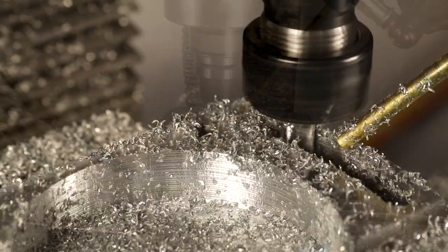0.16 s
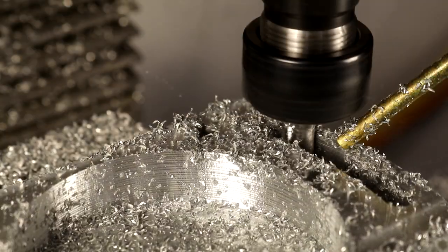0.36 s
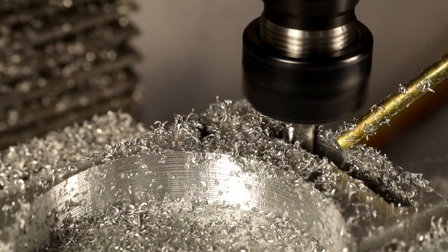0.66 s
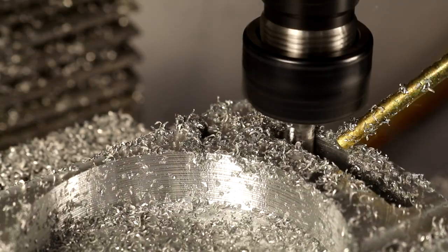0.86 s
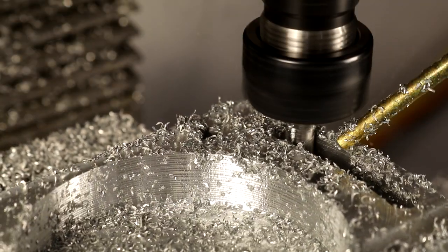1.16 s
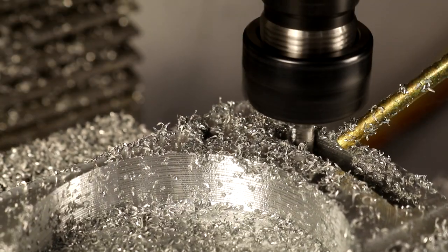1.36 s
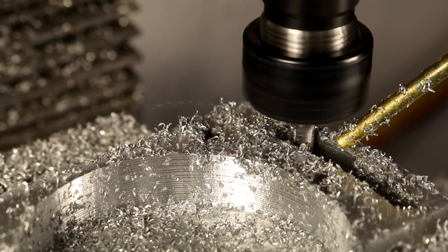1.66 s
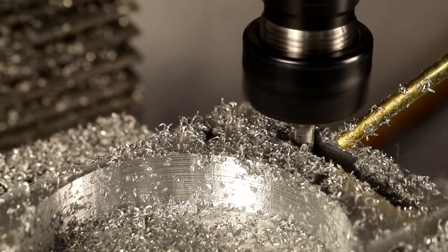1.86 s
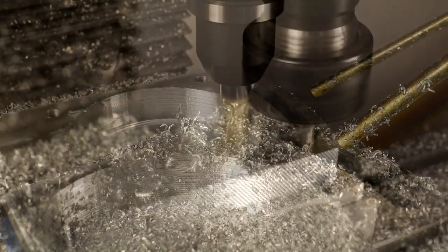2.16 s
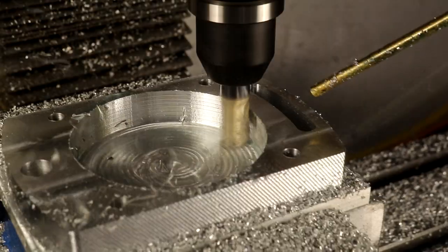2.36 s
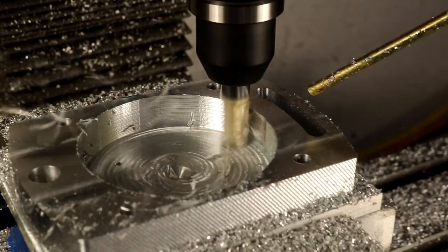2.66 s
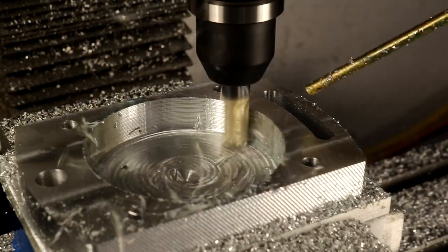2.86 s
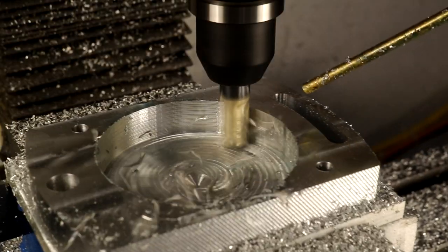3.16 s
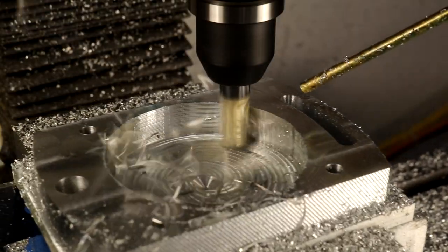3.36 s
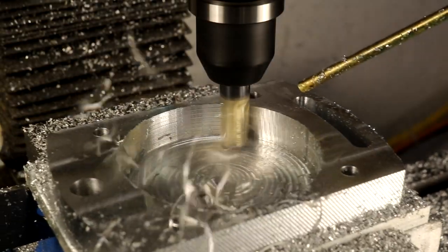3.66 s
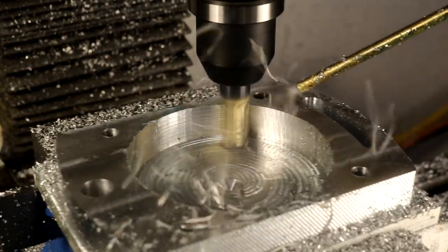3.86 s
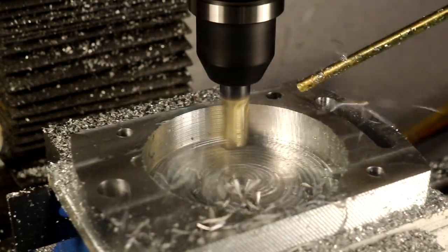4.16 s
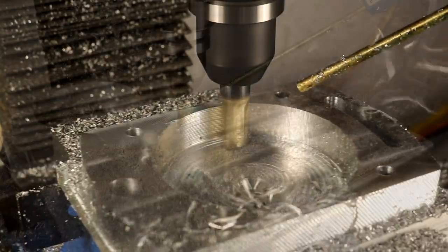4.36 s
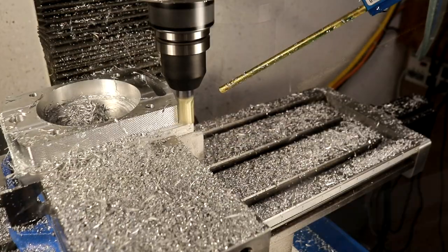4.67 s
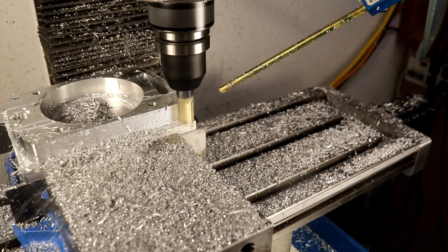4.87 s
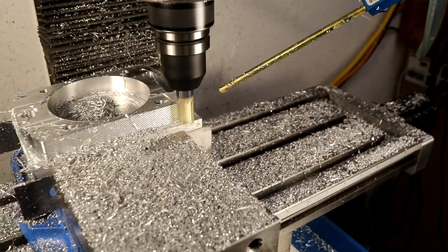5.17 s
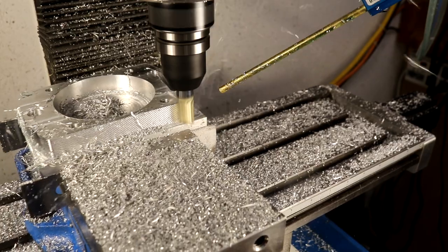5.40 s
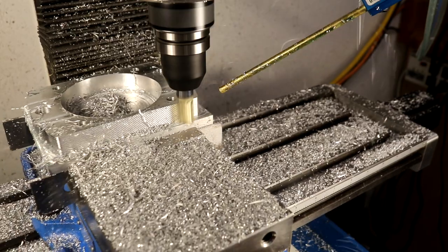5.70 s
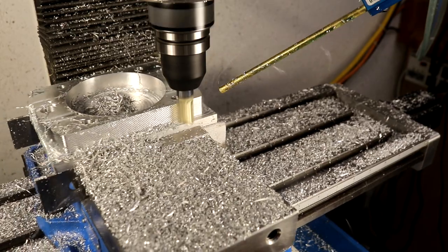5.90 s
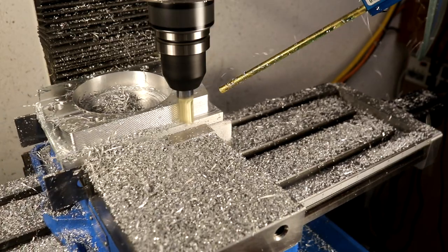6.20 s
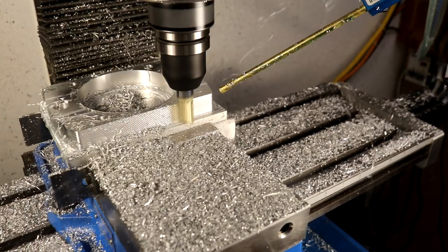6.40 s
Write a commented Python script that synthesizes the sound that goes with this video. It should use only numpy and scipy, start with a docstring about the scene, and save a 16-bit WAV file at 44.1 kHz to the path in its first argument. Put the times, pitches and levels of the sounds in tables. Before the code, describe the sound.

Close to a milling machine, a cutter rasps through metal under a constant, faintly whistling hiss of air. Four passes blend into one another: a very short heavy cut, a quieter one with ticking chips, a throbbing cut that squeals and groans briefly as chips strike the enclosure, and a stronger humming cut with thin ringing and chatter. The surrounding walls add only weak echoes.

```python
"""A three-flute end mill cuts aluminium in a milling machine; four passes dissolve into each other.
Periodic cutting forces hum at multiples of the spindle speed, and tearing metal rasps, partly alike on
every turn. An air jet hisses over the cutter, chopped by its flutes, and makes hollows of the work whistle.
Flung chips patter on the enclosure, whose walls add weak echoes. At times resonances of the cut squeal,
groan or chatter, and the table thrums as the last pass bites."""
import sys
import numpy as np
from scipy import signal
from scipy.fft import rfft, irfft, next_fast_len
from scipy.io import wavfile
from scipy.ndimage import map_coordinates

SR = 44100
rng = np.random.default_rng(int(sys.argv[2]) if len(sys.argv) > 2 else 0)


def to_wav(s):
    """Save 16-bit WAV."""
    ch = np.atleast_2d(s).T  # columns
    pcm = np.round(np.clip(ch, -1, 1) * 32767)  # PCM
    wavfile.write(sys.argv[1], SR, pcm.astype(np.int16))


N = 288414
TIME = np.arange(N) / SR
FLUTES = 3

# The passes: heavy, light, pocket, edge. Each row: fade-in start and end in seconds, spindle speed in Hz,
# repeating share of the midrange rasp (0-1), flute beat depth in dB, air chop depth in dB.
PASSES = [(-.2, -.1, 41.4, 0.16, 2, -0.5), (0.137, 0.342, 42.82, 0.11, -0.5, 1),
          (2.005, 2.437, 41.39, 0.16, 1.2, 0.83), (4.292, 4.645, 41.41, 0.2, 1, 1.5)]
# The steady cut of each pass. Each row: rasp level, hum level, throb depth, chatter depth, all in dB.
CUTS = [(-39.5, -51, 1, 2), (-50, -66.5, 0.5, 3), (-45, -47.5, 0.5, -0.2), (-41, -44, 1.5, 0.1)]
# Rasp and hum swell or sink; near 4.5 s the hum dips briefly as two passes dissolve into each other.
# Each row: peak, rise, fall in seconds, rasp and hum change in dB.
CUT_SWELLS = [(0.03, 0.12, 0.083, 3, 4.5), (2.07, 0.073, 0.13, 2, -1), (2.45, 0.13, 0.25, 0.5, 1.5),
              (2.99, 0.46, 0.41, 3, 3), (4.48, 0.05, 0.099, 1, -8), (4.76, 0.17, 0.66, 1.5, 1.5),
              (5.76, 0.12, 0.061, 0.5, 3), (6.3, 0.53, 0.25, -1, -1)]
# Broad response of work and machine to the cut. Each row: frequency in Hz, relative gain in dB.
BODY_HEAVY = [(25, -27), (105, -28), (186, -14), (263, -6), (284, -10), (607, -7.5), (830, -3), (873, -9),
              (1110, -5.5), (2330, -5), (2630, 0.5), (3490, -3), (4600, -8), (5600, -24)]
BODY_LIGHT = [(25, -24), (90, -25), (105, -7), (152, -18), (205, -13), (263, -2), (402, -7.5), (660, -11.5),
              (840, -0.5), (1060, -10), (1250, -4.5), (3500, -1), (3800, -11.5), (4500, -20), (5600, -28)]
BODY_POCKET = [(25, -32), (90, -7.5), (152, -17), (169, -7.5), (243, -3), (352, -6), (483, -5.5),
               (513, -2.5), (676, -8), (830, -3.5), (1160, -10.5), (1390, -3.5), (4600, -6), (5600, -34)]
BODY_EDGE = [(25, -26), (37, -22), (49, -13), (76, -31), (120, -4.5), (136, -15.5), (205, -9.5),
             (223, -7.5), (263, -3), (295, -2.5), (352, -11.5), (1970, -8), (3220, -5), (4600, -11),
             (5600, -23)]
# Sharp resonances of tool and work. Each row: frequency in Hz, width in Hz, lift in dB.
MODES_HEAVY = [(814, 30, 9.5), (1720, 200, 2.5), (3400, 380, 3.5)]
MODES_LIGHT = [(297, 14, 6.5), (1900, 30, 3.8), (2790, 170, 3.1), (3550, 300, 3.8)]
MODES_POCKET = [(539, 18, 5.7), (1330, 88, 0.6), (2440, 72, 6), (3640, 150, 4.6)]
MODES_EDGE = [(3290, 40, 3.5), (1560, 210, 1.4)]
# Stereo image of the rasp. Each row: frequency in Hz, left-right coherence (0-1).
RASP_COHERENCE = [(40, 0.72), (150, 0.76), (380, 0.85), (950, 0.62), (4000, 0.6)]
# The hum throbs: its strongest brief swells and dips.
# Each row: peak and half-length in seconds, change in dB.
HUM_THROBS = [(2.45, 0.03, 3), (2.5, 0.014, -7), (2.64, 0.025, -6), (2.73, 0.025, 4), (2.78, 0.018, -5),
              (2.85, 0.025, 3), (2.985, 0.02, -5), (3.1, 0.022, 3.5), (3.145, 0.022, -5), (3.52, 0.04, 4),
              (4.89, 0.014, -7), (4.95, 0.016, -6), (5.08, 0.016, -8), (5.18, 0.022, 2.5),
              (5.28, 0.022, 2.5), (5.425, 0.022, 5), (5.845, 0.02, -7), (5.91, 0.05, -3)]
# Tones locked to the spindle. Each row: multiple of the spindle speed, base level in dB.
ORDERS_HEAVY = [(2, -67), (3, -60), (11, -60), (18, -61), (20, -49.5), (22, -60), (24, -56), (30, -61),
                (32, -56), (41, -60), (68, -56)]
ORDERS_LIGHT = [(1.5, -85), (2, -92), (3, -75), (8, -89), (44, -73)]
ORDERS_POCKET = [(2, -79), (3, -63), (4, -68), (7, -65.5), (9, -63), (13, -63), (17, -68), (20, -72),
                 (29, -70), (35, -63), (38, -74)]
ORDERS_EDGE = [(1, -79), (2, -73), (3, -57.5), (4, -74), (5, -64), (7, -66.5), (8, -62), (9, -58),
               (11, -71), (13, -64), (16, -70), (17, -64), (20, -62.5), (23, -68), (29, -69), (35, -64),
               (38, -61.5), (79, -59)]
# The air of each pass. Each row: level in dB, fizz drift in dB per second, time and half-length in
# seconds of the cutter's crossing of the jet, rise at the crossing in dB.
AIR = [(-34.5, 1, 0.03, 0.15, 1.5), (-34, 2.5, 0.7, 0.55, 1.3), (-35, -2, 3.38, 1, 2.5),
       (-34, -0.5, 5.8, 1, 2.5)]
# Spectrum of the jet breaking on tool and work. Each row: frequency in Hz, relative gain in dB.
JET_HEAVY = [(4000, -27), (5080, -14), (5600, -11.5), (7060, -7.5), (7670, -1.5), (7920, -5.5),
             (9560, -12.5), (10770, -12), (12490, -15), (13090, -18), (15590, -19)]
JET_LIGHT = [(3120, -23.5), (3960, -22), (4310, -15), (4480, -20), (4720, -16.5), (5150, -12), (5400, -12),
             (5800, -10), (6550, -12), (6890, -6), (7060, -10.5), (7600, 1), (7950, -4.5), (8150, -2.5),
             (8350, -4), (8560, -0.5), (9390, -14.0), (10770, -7), (11020, -13), (11630, -11.5),
             (12490, -17), (13090, -14), (15160, -16.5), (15590, -20)]
JET_POCKET = [(4000, -23.5), (5080, -11.5), (6250, -6), (6750, -3), (7000, -5), (7550, -1), (7920, -1.5),
              (8350, -1), (9650, -5.5), (10250, -9.5), (10850, -7), (11630, -10), (13700, -11),
              (14810, -15), (15590, -15.5)]
JET_EDGE = [(4160, -18.5), (5250, -9), (5430, -9.5), (5770, -4.5), (6290, -6.5), (6630, -1.5), (6980, -3),
            (8530, 0.0), (8790, -2), (9040, -1), (10850, -6.5), (12490, -6), (13400, -10), (14300, -8),
            (15590, -15)]
# Apparent direction of the jet.
# Each row: frequency in Hz, left minus right in dB, left phase lead in radians, coherence (0-1).
PLACE_HEAVY = [(5500, -2, -1.5, 0.5), (7700, -7, -0.5, 0.4), (10500, -5, -2.5, 0.3),
               (15000, -4.6, -1.5, .35)]
PLACE_LIGHT = [(3870, -2.3, 0.5, 0.99), (4600, -5, -3.5, 0.43), (4950, 3, -7, 0.71), (5450, -3, -9, 0.89),
               (6400, -10, -7.5, 0.44), (7240, -7.5, -9, 1), (8500, -13.5, -8, 0.98), (9350, -6.5, -7.5, 1),
               (11500, -6, -9, 0.53), (15000, -5, -9, .5)]
PLACE_POCKET = [(5000, 1, -0.79, 0.6), (6100, -5.5, -0.84, 0.45), (7700, -4, -0.52, 0.78),
                (10500, -2.5, -1, 0.46), (15000, -4.5, -1.4, .3)]
PLACE_EDGE = [(5000, -2.5, 1.2, .1), (5900, -4.5, 1.1, .35), (7000, -1.5, 0.37, 0.71),
              (9000, -3.5, .3, .72), (10700, -2, 0.75, .55), (15000, 0, 0.64, 0.61)]
# The cutter deflects the jet. Each row: peak and half-length in seconds, change in dB.
JET_FLARES = [(2.68, 0.066, 1), (3.2, 0.08, 0.7), (3.5, 0.12, -0.7), (4.17, 0.08, 0.4), (5.72, 0.039, 0.3),
              (5.96, 0.089, -1.5)]
# Whistling hollows. Each row: peak, rise, fall in seconds, pitch and width in Hz, left and right in dB.
HOLLOWS = [(0.5, 0.6, 0.7, 5100, 190, -57, -54), (0.45, 0.7, 0.9, 7750, 140, -52, -42),
           (1.7, 0.91, 0.9, 8080, 110, -55, -39), (2.1, 0.7, 0.63, 8520, 200, -57, -41),
           (2.27, 0.17, 0.28, 11730, 750, -44, -43), (2.75, 0.3, 0.55, 8310, 120, -49, -43),
           (3, 1.04, 1.4, 6660, 170, -51.5, -46), (3.6, 0.47, 1, 9740, 460, -45.5, -39),
           (3.95, 0.5, 0.55, 7780, 130, -49, -43), (4.15, 0.7, 0.93, 7440, 170, -52, -41)]
# Larger chips hitting the enclosure. Each row: start in seconds, base level in dB, ping pitch in Hz.
LARGE_CHIPS = [(0.6938, -41, 1840), (0.8385, -42, 1700), (0.8537, -40, 1850), (0.945, -40, 1445),
               (1.008, -44, 1880), (1.2057, -43, 1850), (1.256, -39.5, 1890), (1.3564, -46, 1900),
               (1.486, -43, 1540), (1.6284, -40, 1890), (2.455, -36, 1390), (2.577, -33.5, 1360),
               (2.629, -41, 1440), (2.7, -39, 1410), (2.794, -41, 1420), (2.82, -42, 1350),
               (2.9153, -38, 1320), (2.928, -40, 2280), (2.9582, -36, 1470), (3.0137, -32.5, 1820),
               (3.133, -38, 1330), (3.305, -42, 1890), (3.715, -39, 1440)]
# Modes of the enclosure panel. Each row: frequency in Hz, width in Hz, gain in dB.
PANEL_MODES = [(820, 67, -1), (1326, 150, 5.5), (1830, 120, -0.5), (1870, 30, -1), (2320, 140, -16)]
# Squeals of the cutter. Each row: peak, rise, fall in seconds, pitch at the peak in Hz,
# glide in Hz per second, width in Hz, left and right level in dB.
SQUEALS = [(2.4, 0.23, 0.19, 3344, 380, 340, -50.5, -46), (3.01, 0.07, 0.05, 2460, 0, 120, -50, -48.5),
           (4.85, 0.33, 0.5, 2950, 0, 109, -56, -54), (4.9, 0.3, 0.5, 2480, -1, 130, -53, -53),
           (5, 0.35, 0.45, 1131, 0, 160, -53, -52), (6.3, 0.6, 0.4, 3240, 0, 50, -60, -54)]
# The pocket wall groans. Each row: peak and half-length in seconds, level in dB.
GROANS = [(2.77, 0.07, -49), (3.01, 0.024, -50), (3.113, 0.035, -54), (3.39, 0.024, -57),
          (3.78, 0.08, -55.5), (4, 0.074, -55), (4.52, 0.034, -51.5)]
# The table shakes as the last pass bites. One row: peak, rise, fall in seconds, level in dB.
THRUM = (4.53, 0.08, .11, -57)
# The cutter chatters along the edge. Each row: peak and half-length in seconds, level in dB.
CHATTERS = [(4.75, 0.04, -52), (4.98, 0.025, -49.5), (5.11, 0.02, -50.5), (5.39, 0.03, -49),
            (5.77, 0.04, -53)]


def amp(db):
    """Decibels to amplitude ratio."""
    return 10 ** (np.asarray(db) / 20)


def unit(x):
    """Normalisation to rms 1."""
    return x / np.sqrt(np.mean(x ** 2) + 1e-20)


def along(points, hz, column=1):
    """Interpolation of a table column over log frequency."""
    cols = np.transpose(points)
    return np.interp(np.log(hz + 1), np.log(np.sort(cols[0]) + 1), cols[column])


def wobble(rate):
    """Smooth random modulation, rate knots a second."""
    coarse = np.linspace(0, N / SR, 4096)
    knots = rng.standard_normal(int(N * rate / SR) + 4)
    return np.interp(TIME, coarse, map_coordinates(knots, [coarse * rate]))


def swell(peak_s, rise_s, fall_s):
    """An asymmetric Gaussian envelope of height 1."""
    return np.exp(-((TIME - peak_s) / np.where(TIME < peak_s, rise_s, fall_s)) ** 2)


def bumps(rows):
    """A level change in dB, as a sum of Gaussian swells."""
    return sum(db * swell(s, half_s, half_s) for s, half_s, db in rows)


def filtered(x, response):
    """Linear filtering: the spectrum times a frequency response."""
    m = next_fast_len(N + 8192, real=True)
    return irfft(rfft(x, m) * response(np.fft.rfftfreq(m, 1 / SR)), m)[..., :N]


def stereo(pair, coherence):
    """Mid-side mixing gives two independent signals a coherence that varies with frequency."""
    m = next_fast_len(N, real=True)
    angle = np.arccos(along(coherence, np.fft.rfftfreq(m, 1 / SR))) / 2
    mid, side = rfft(pair, m) * [np.cos(angle), np.sin(angle)]
    return irfft([mid + side, mid - side], m)[:, :N]


def resonance(centre_hz, width_hz):
    """A noise-driven resonance gives narrow-band noise, rms 1; its centre may move."""
    a, b = filtered(rng.standard_normal((2, N)), lambda hz: 1 / (1 + (hz / width_hz) ** 2))
    phase = 2 * np.pi * np.cumsum(centre_hz * np.ones(N)) / SR
    return unit(a * np.cos(phase) + b * np.sin(phase))


def rotation(speed_hz, drift=0.000912):
    """Phase in turns is the integral of a slightly wandering speed."""
    return np.cumsum(speed_hz * (1 + drift * wobble(5))) / SR


def flute_beat(turns, depth_db, runout=0.35):
    """Amplitude modulation by each passing flute; runout makes one stand out."""
    angle = 2 * np.pi * turns
    return unit(amp(depth_db * (np.cos(FLUTES * angle) + runout * np.cos(angle))))


def rasp(turns, body, modes, repeat, beat_db, flutter_db=.55, size=1024):
    """Source and filter: the force of tearing metal, part periodic, part random, drives tool and work."""
    def share(hz):
        """The periodic share of the power, greatest in the midrange."""
        return repeat / (1 + (750 / (hz + 1)) ** 16) / (1 + (hz / 2200) ** 2)

    def response(hz):
        """Resonances add peaks to the broad response."""
        peaks_db = sum(db / (1 + (2 * (hz - centre) / width) ** 2) for centre, width, db in modes)
        return amp(along(body, hz) + peaks_db)

    one_turn = irfft(np.exp(2j * np.pi * rng.random((2, size // 2 + 1))))
    looped = np.array([np.interp(turns % 1, np.arange(size) / size, side, period=1) for side in one_turn])
    periodic = filtered(unit(looped), lambda hz: np.sqrt(share(hz)))
    fresh = filtered(rng.standard_normal((2, N)), lambda hz: np.sqrt(1 - share(hz)))
    force = (periodic + fresh) * flute_beat(turns, beat_db) * amp(flutter_db * wobble(45))
    sound = filtered(stereo(force, RASP_COHERENCE), response)
    midrange = filtered(sound.mean(0), lambda hz: (hz > 600) & (hz < 4400))
    return sound / np.std(midrange)


def hum(turns, throb_db, chatter_db, throb_hz=12.8):
    """Frame resonance at twice the flute rate; it throbs loosely, and its level flickers at random."""
    throb = np.sin(2 * np.pi * (rotation(throb_hz, drift=.12) + rng.random()))
    level = amp(throb_db * throb + chatter_db * wobble(16))
    return unit(level * np.sin(2 * np.pi * 2 * FLUTES * turns))


def cutting(turns, cut, rasp_swell_db, hum_swell_db, body, modes, repeat, beat_db):
    """Superposition of the rasp and hum of one pass, each swelling and sinking in level."""
    rasp_db, hum_db, throb_db, chatter_db = cut
    balance = amp([[-1.3], [-.5]])  # left, right
    tearing = balance * amp(rasp_db + rasp_swell_db) * rasp(turns, body, modes, repeat, beat_db)
    humming = amp(hum_db + hum_swell_db + bumps(HUM_THROBS)) * hum(turns, throb_db, chatter_db)
    return tearing + humming


def spindle_tones(turns, orders, waver_db=.9, slip_rad=0.055):
    """Forced vibration at multiples of the spindle speed, each tone wavering on its own."""
    tones = np.zeros(N)
    for order, db in orders:
        level = np.sqrt(2) * amp(db + waver_db * wobble(14))
        tones += level * np.sin(2 * np.pi * (order * turns + rng.random()) + slip_rad * wobble(21))
    return tones


def work_reflection(air, bounce_db=-11.5, delays_s=(.0031, .0024), wander_s=.00005):
    """Comb filtering: the hiss meets its echo off the work, whose path shifts as the table moves."""
    echoes = [map_coordinates(side, [(TIME - delay_s - wander_s * wobble(1.2)) * SR])
              for side, delay_s in zip(air, delays_s)]
    return air + amp(bounce_db) * np.array(echoes)


def jet(turns, colour, place, chop_db, flutter_db=0.42, fizz_hz=10000):
    """Turbulence makes broadband noise, chopped by the flutes; returns the hiss and the fizz above it."""
    def response(hz):
        """The jet's high-passed spectrum, shared between left and right at constant power."""
        left = amp(along(place, hz, column=1)) * np.exp(1j * along(place, hz, column=2))
        pan = np.array([left, np.ones(len(hz))]) / np.sqrt(1 + abs(left) ** 2)
        return amp(along(colour, hz)) * pan / np.sqrt(1 + (3400 / (hz + 100)) ** 20)

    noise = stereo(rng.standard_normal((2, N)), [(hz, coherence) for hz, _, _, coherence in place])
    chopped = noise * flute_beat(turns, chop_db) * amp(flutter_db * wobble(40))
    air = unit(work_reflection(filtered(chopped, response)))
    hiss = filtered(air, lambda hz: 1 / (1 + (hz / fizz_hz) ** 24))
    return hiss, air - hiss


def blowing(turns, air, colour, place, chop_db):
    """Flow noise swells as the cutter obstructs the jet; its fizz drifts as the table moves."""
    level_db, drift_db_per_s, cross_s, half_s, rise_db = air
    hiss, fizz = jet(turns, colour, place, chop_db)
    level = amp(level_db + rise_db * swell(cross_s, half_s, half_s) + bumps(JET_FLARES))
    return level * (hiss + amp(drift_db_per_s * (TIME - cross_s)) * fizz)


def hollows():
    """Cavity resonance: each hollow whistles at its own pitch as the jet sweeps over it."""
    return sum(amp([[left_db], [right_db]]) * swell(s, rise_s, fall_s) * resonance(hz, width_hz)
               for s, rise_s, fall_s, hz, width_hz, left_db, right_db in HOLLOWS)


def panel(hz):
    """Modal superposition: the panel responds as a sum of resonators of alternating sign."""
    return sum((-1) ** k * amp(db) * 1j * hz * width / (centre ** 2 - hz ** 2 + 1j * hz * width)
               for k, (centre, width, db) in enumerate(PANEL_MODES))


def chips(rasp_swell_db, small_count=170, patter_db=-50, rattle_db=6, tick_db=5, ping_db=-4):
    """Impact excitation: each chip ticks, rattles the panel and pings; small ones swell with the rasp."""
    rattle_t60, tick_t60, ping_t60, attack_s = .035, .014, .042, .0004
    t = np.arange(SR // 8) / SR
    small = [(when * N / SR,
              patter_db + 1.2 * rasp_swell_db[int(when * N)] + 3 * np.log(-np.log(size)),
              1300 + 800 * spot) for when, size, spot in rng.random((small_count, 3))]
    rattles, pings, ticks = np.zeros((3, N + len(t)))
    onset = 1 - np.exp(-t / attack_s)
    for s, db, hz in list(LARGE_CHIPS) + small:
        at = slice(int(s * SR), int(s * SR) + len(t))
        scrape = rng.standard_normal(len(t))
        rattles[at] += amp(db + rattle_db - 60 * t / rattle_t60) * scrape
        ticks[at] += amp(db + tick_db - 60 * t / tick_t60) * scrape[::-1]
        pings[at] += amp(db + ping_db - 60 * t / ping_t60) * onset * np.sin(2 * np.pi * hz * t)
    contact = signal.butter(2, [1200, 2900], "band", fs=SR, output="sos")
    return filtered(rattles[:N], panel) + pings[:N] + signal.sosfilt(contact, ticks[:N])


def squeals():
    """Noise-driven resonance: the cutter rings hoarsely, and may glide, as it leans into a wall."""
    return sum(amp([[left_db], [right_db]]) * swell(s, rise_s, fall_s)
               * resonance(hz + glide * (TIME - s), width_hz)
               for s, rise_s, fall_s, hz, glide, width_hz, left_db, right_db in SQUEALS)


def pressed_mode(spells, hz, slip_rad):
    """Groan or chatter: a single mode sings, its phase wandering, while the cutter presses on it."""
    level = sum(amp(db) * swell(s, half_s, half_s) for s, half_s, db in spells)
    return level * np.sqrt(2) * np.sin(2 * np.pi * hz * TIME + slip_rad * wobble(45))


def thrum(speed_hz=41.4):
    """Forced vibration: the table shakes twice a turn as the cutter enters the edge."""
    s, rise_s, fall_s, db = THRUM
    return amp(db) * swell(s, rise_s, fall_s) * np.sqrt(2) * np.sin(2 * np.pi * 2 * rotation(speed_hz))


def enclosure(x, count=10, wall_db=-15, delays_s=(.002, .014)):
    """Interference with early wall reflections ripples the treble, differently on each side."""
    walls = np.zeros((2, SR // 50))
    for side in walls:
        side[(rng.uniform(*delays_s, count) * SR).astype(int)] = rng.choice([-1, 1], count)
    echoes = signal.fftconvolve(x, walls / np.sqrt(count), axes=1)[:, :N]
    return x + amp(wall_db) * filtered(echoes, lambda hz: 1 / (1 + (1500 / (hz + 1)) ** 4))


def crossfades():
    """Linear crossfades: each pass rises while the one before sinks."""
    up = np.array([np.clip((TIME - start) / (end - start), 0, 1) for start, end, *_ in PASSES])
    return np.maximum(up - np.vstack([up[1:], np.zeros(N)]), 0)


def scene(tone_follow=0.28):
    """Superposition of chips, resonances and the cut, air and tones of each pass in the enclosure."""
    weights = crossfades()
    equal_power = weights / np.sqrt(np.sum(weights ** 2, 0) + 1e-9)
    rasp_swell_db, hum_swell_db = sum(np.outer([rasp_db, hum_db], swell(s, rise_s, fall_s))
                                      for s, rise_s, fall_s, rasp_db, hum_db in CUT_SWELLS)
    timbres = [(BODY_HEAVY, MODES_HEAVY, ORDERS_HEAVY, JET_HEAVY, PLACE_HEAVY),
               (BODY_LIGHT, MODES_LIGHT, ORDERS_LIGHT, JET_LIGHT, PLACE_LIGHT),
               (BODY_POCKET, MODES_POCKET, ORDERS_POCKET, JET_POCKET, PLACE_POCKET),
               (BODY_EDGE, MODES_EDGE, ORDERS_EDGE, JET_EDGE, PLACE_EDGE)]
    mix = chips(rasp_swell_db) + thrum()
    mix += pressed_mode(GROANS, hz=535.5, slip_rad=1.1)
    mix += pressed_mode(CHATTERS, hz=3263, slip_rad=.6)
    mix = mix + hollows() + squeals()
    for i, (_, _, speed_hz, repeat, beat_db, chop_db) in enumerate(PASSES):
        body, modes, orders, colour, place = timbres[i]
        turns = rotation(speed_hz)
        cut = cutting(turns, CUTS[i], rasp_swell_db, hum_swell_db, body, modes, repeat, beat_db)
        air = blowing(turns, AIR[i], colour, place, chop_db)
        tones = amp(tone_follow * hum_swell_db) * spindle_tones(turns, orders)
        mix += equal_power[i] * (cut + air) + weights[i] * tones
    return enclosure(mix)


def record(dry, top_hz=15850):
    """Band limiting: an ideal low-pass removes the highest treble."""
    return filtered(dry, lambda hz: hz < top_hz)


dry = scene()
out = record(dry)
to_wav(out)
```